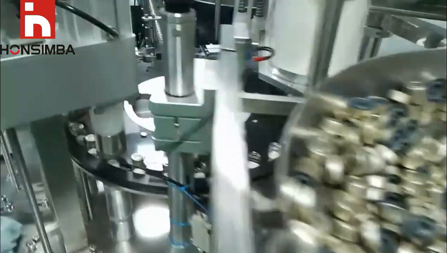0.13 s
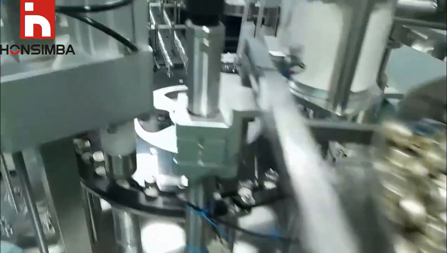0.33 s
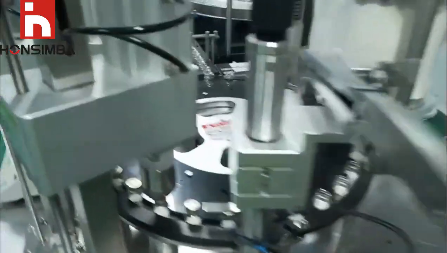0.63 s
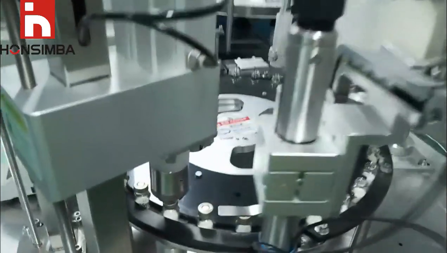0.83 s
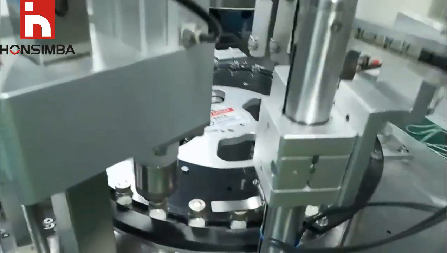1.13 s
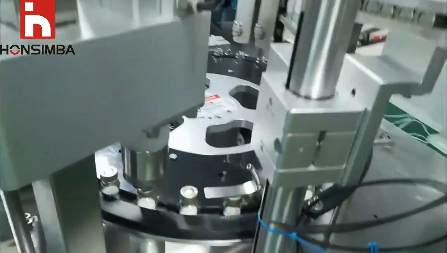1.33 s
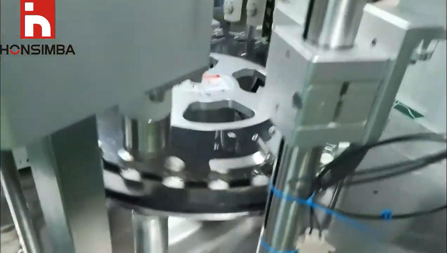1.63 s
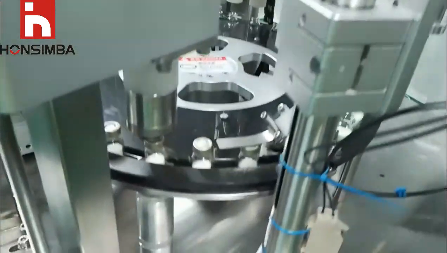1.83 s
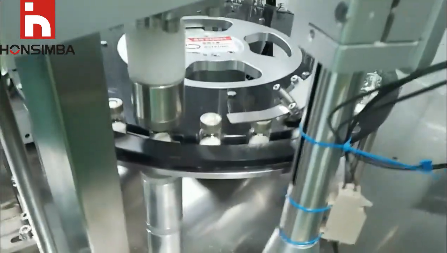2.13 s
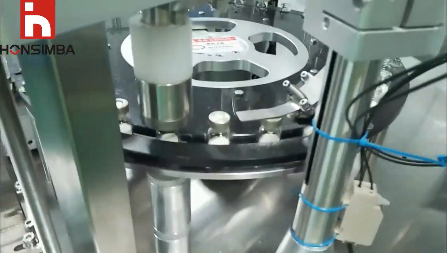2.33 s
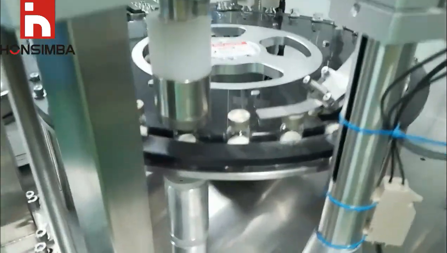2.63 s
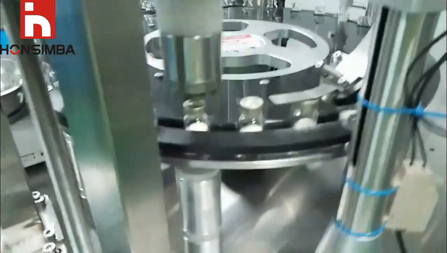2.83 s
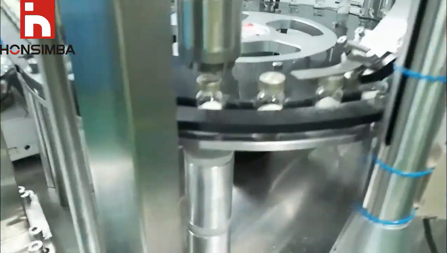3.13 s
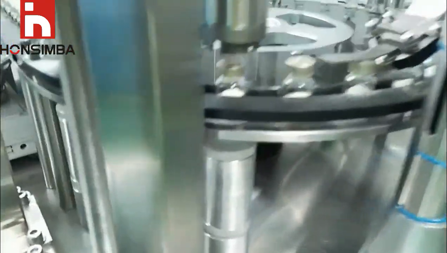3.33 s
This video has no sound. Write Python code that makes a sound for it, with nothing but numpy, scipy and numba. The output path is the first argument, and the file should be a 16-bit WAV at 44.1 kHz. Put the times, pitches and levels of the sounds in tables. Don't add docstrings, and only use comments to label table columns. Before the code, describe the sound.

Pneumatic capping machine in a factory hall, heard close on a thin phone microphone: bright whistling air jet, short valve spits with metallic clicks, a long hissing blast, then puffs, crimping whirr and thuds.

```python
import sys
import numpy as np
from scipy import signal
from scipy.fft import rfft, irfft
from scipy.io import wavfile
from scipy.ndimage import uniform_filter1d
from numba import njit

SR = 44100
rng = np.random.default_rng(int(sys.argv[2]) if len(sys.argv) > 2 else 0)


def wrap_up_sound(samples):
    columns = np.atleast_2d(samples).T
    tamed = np.clip(columns, -1, 1)
    steps = np.round(tamed * 32767).astype(np.int16)
    wavfile.write(sys.argv[1], SR, steps)


def nominal_scale(level):
    x = np.asarray(level, float) / 20
    return 10 ** x


N = 154350

# frequency in Hz, density in dB per Hz.
LEAK_SPECTRUM = [(700, -26.5), (1300, -4), (2600, -1.5), (4500, -5), (6500, -2.5), (8200, 2), (10300, -7),
                 (14500, -10)]
# time in seconds, level change in dB.
LEAK_PATH = [(0, 0), (.6, 0.5), (.88, 0), (1.27, .5), (1.7, 0.5), (1.85, -2), (2.04, -1.5), (3.0, 1),
             (3.3, -0.5), (3.5, 0.5)]
# frequency in Hz, density in dB per Hz.
HALL_SPECTRUM = [(20, -48), (60, -26), (105, -18), (160, -31), (200, -14), (290, -4.5), (600, -6),
                 (1500, -7)]
# frequency in Hz, width in Hz, level in dB.
FRAME_MODES = [(286.3, 60, -51), (209.2, 17, -64.5), (629, 100, -51), (740, 100, -54)]
# frequency in Hz, rms level in dB.
MAINS_HUM = [(100, -63)]
# start in seconds, peak level in dB, pitch in Hz, decay time (T60) in seconds.
THUDS = [(0.47, -27.5, 275, 0.26), (.47, -33, 641, 0.35), (.4, -33, 730, .15), (.5, -36, 520, .15),
         (0.574, -26.5, 310, 0.11), (.63, -36, 285, .12), (.77, -32.5, 285, 0.14), (.87, -38, 287, 0.18),
         (.955, -39, 287, 0.2), (1.118, -29, 1290, 0.045), (1.12, -29, 780, .04), (1.122, -28, 1900, .03),
         (1.116, -24.5, 940, 0.036), (1.125, -29, 605, 0.088), (1.123, -26, 415, 0.2),
         (1.135, -33, 280, .3), (1.211, -39, 259.6, 0.39), (2.045, -33, 301, 0.32), (2.09, -36, 266, 0.28),
         (2.045, -48, 58, 0.5), (1.121, -45, 109.5, 0.094), (2.959, -46.5, 116.5, 0.26),
         (0.53, -47, 110.6, 0.42), (2.132, -24, 682, 0.08), (2.141, -31.5, 318, 0.15),
         (2.853, -27, 660, .1), (2.87, -34, 720, .3), (2.92, -35, 620, .3), (2.855, -32.5, 259.6, 0.38),
         (2.855, -32.5, 479, 0.13), (2.9, -32.5, 268.5, 0.21), (2.956, -29, 302, 0.15),
         (3.03, -36, 292, 0.33), (3.47, -33, 685, 0.22), (3.485, -28.5, 377, 0.21)]
# start in seconds, length in seconds, level in dB, centre in Hz.
WHIRRS = [
    (3.05, 0.19, -34, 1500),
    (2.03, 0.34, -32, 2050),
    (2.3, .24, -29, 12000),
    (2.13, .2, -42, 700),
]
# frequency in Hz, density in dB per Hz.
JET_SPECTRUM = [(500, -21), (1180, -19), (2160, -12.5), (4310, -8.5), (6600, -3.5), (8300, -1.5),
                (10300, -9), (14500, -12)]
# frequency in Hz, width in Hz, level in dB.
NOZZLE_MODES = [(6540, 700, -0.5), (8476, 1100, -0.5), (2185, 390, -14)]
# peak time in seconds, level in dB, rise in seconds, fall in seconds, dull body share in dB.
PUFFS = [(0.487, -19.5, 0.024, 0.022, -33), (0.586, -23.5, 0.02, 0.047, -10.5),
         (.82, -30, 0.045, 0.024, -4), (1.126, -19.5, 0.0095, 0.012, -3.5),
         (1.224, -27.5, 0.029, 0.021, -17), (1.5075, -15, 0.0045, 0.0037, -8),
         (1.52, -25, .006, 0.0064, -12), (1.57, -26, .01, 0.0073, -29), (1.583, -20, .002, 0.0078, -5),
         (1.624, -25, 0.006, .005, -20), (1.6432, -15.5, 0.003, 0.005, -16),
         (1.634, -27, .003, 0.0033, -20), (1.75, -31, 0.033, 0.074, -33), (2.13, -21.5, 0.0015, 0.034, 1),
         (2.701, -21, 0.016, 0.038, -38), (2.751, -20.5, .01, 0.0092, -14.5),
         (2.77, -20, 0.009, 0.012, -11), (2.799, -17, 0.023, 0.0088, -12), (2.829, -32, 0.02, 0.011, -6),
         (2.864, -14, 0.011, 0.013, -14), (2.939, -29.5, 0.024, 0.053, -2),
         (3.2, -28.5, 0.063, 0.027, -5.5), (3.497, -21.5, 0.0088, 0.0096, -7)]
# start in seconds, peak level in dB, pitch in Hz.
TICKS = [(1.5808, -12.5, 5470), (2.1276, -25, 7900), (2.6, -28, 5800), (3.212, -15, 7000),
         (0.51, -32, 5500), (1.5055, -23, 7150), (1.4, -22, 8110), (1.642, -20, 5000), (1.6, -16.5, 6600),
         (2.7432, -24, 5000), (2.8609, -16, 11000), (.5776, -22, 8310), (1.1228, -19.5, 8560),
         (3.1, -20, 8620)]
# time in seconds, flow level in dB, guard slot whistle in dB.
BLASTS = [
    [(0, -18, 2.5), (.08, -15.5, 0), (.15, -16, 2), (.265, -18.5, 2.5), (.338, -26.5, 4), (.38, -22.5, -3),
     (.418, -20.5, 0), (.446, -29.5, -1), (.46, -26.5, 0.5)],
    [(2.04, -40, -2), (2.048, -24.5, 1), (2.065, -26, 1), (2.1, -22, 1), (2.126, -31, 0)],
    [(2.129, -16.5, 1.5), (2.166, -18, 3), (2.2, -15, 3), (2.32, -14.5, 0.5), (2.365, -16, 1),
     (2.45, -15, -3), (2.55, -14, -2.5), (2.58, -16.5, -1.5), (2.64, -15, -4)],
]
# frequency in Hz, rounding step over band rms in dB.
PHONE_STEP = [(600, -12), (1500, 1), (2200, 6.5), (4900, 6.8), (5900, 2.5), (9500, 3), (10800, 6.8),
              (14000, 6.8)]
THIN_MIDS_S = [.15, .195, .26, .36, .43, .45, .57, .66, .76, .97, .99, 1.15, 1.52, 1.635, 1.96, 2.05, 2.1,
               2.215, 2.36, 2.38, 2.41, 2.6, 2.7, 2.75, 2.8, 2.82, 2.87]
THIN_TOP_S = [.36, .43, .45, .57, .66, .8, .85, 1.13, 1.52, 1.635, 1.82, 1.96, 2.05, 2.52, 2.7, 2.75, 2.82,
              2.96, 3.0, 3.05, 3.17, 3.19, 3.29]

LEAK_DB, LEAK_SWELL_DB, LEAK_FLICKER_DB, HALL_DB = -27.5, 0, 1.04, -39.5
CAPS_PER_S, CAPS_DB, CAP_HZ, CAP_CYCLES = 540, -35, 7307, 16
THUD_PUSH_S, THUD_TAIL_DB, FRAME_T60_S = 0.0033, -13, 0.6
JET_FLICKER_DB, NOZZLE_DB, NOZZLE_FLICKER_DB = 0.8, -6.5, 1.2
SPIT_PER_S, SPIT_DB = 160, -24.5
TICK_T60_S = 0.02
SLOT_HZ, SLOT_WIDTH_HZ, BLAST_TAIL_S = 8460, 1700, 0.076
BUFFET_HZ, BUFFET_DB, SPUTTER_DB = 49.7, -58, 1.0
LIMIT, TOP_HZ = 0.6, 14050
FRAME_LEN, BAND_LINES = 944, 16
STEP_FRAME_DB, STEP_BAND_DB, ROUND_AT, ATTACK_DB = 1.2, 2.4, 0.4, 6
MASK_PER_DB, MASK_HZ, THIN_DB = 0.1, 5600, 5


def rms1(x):
    return x / np.sqrt(np.mean(x ** 2))


@njit
def svf(x, hz, width):
    y, b, l = np.empty(len(x)), 0., 0.
    for i in range(len(x)):
        g, k = np.tan(np.pi * hz[i] / SR), width / hz[i]
        v = (b + g * (x[i] - l)) / (1 + g * (g + k))
        b, l, y[i] = 2 * v - b, l + 2 * g * v, k * v
    return y


def band(hz, width, x=None):
    if x is None:
        x = rng.standard_normal(N)
    hz = np.minimum(hz + np.zeros(N), 0.45 * SR)
    once = svf(x, hz, 1. * width)
    return rms1(svf(once, hz, 1. * width))


def walk(rate):
    k = int(SR / rate)
    steps = np.repeat(rng.standard_normal(N // k + 1), k)
    return 1.3 * uniform_filter1d(uniform_filter1d(steps, k), k)[:N]


def colour(table, flicker_db, rate):
    hz, db = np.array(table, float).T
    bins, out = np.fft.rfftfreq(N, 1 / SR), 0
    shape = nominal_scale(np.interp(np.log(bins + 1), np.log(hz), db, left=-90, right=-90))
    noise = rfft(rng.standard_normal(N)) * shape
    for centre in np.arange(np.log2(hz[0]), np.log2(hz[-1]) + 0.5, 0.5):
        distance = np.clip(2 * (np.log2(bins + 1) - centre), -1, 1)
        part = np.cos(np.pi / 2 * distance) ** 2
        out = out + irfft(noise * part, N) * nominal_scale(flicker_db * walk(rate))
    return rms1(out)


def clicks(per_s, spread_db):
    chance, size = rng.random((N, 2)).T
    return (chance < per_s / SR) * nominal_scale(-spread_db * np.log(size + 1e-9)) * rng.choice([-1, 1], N)


def ring(t, start, hz, t60, push):
    u = np.maximum(t - start, 0)
    return (1 - np.exp(-u / push)) * np.exp(-np.log(1000) * u / t60) * np.sin(2 * np.pi * hz * u)


def factory_hall(t):
    out = nominal_scale(HALL_DB) * colour(HALL_SPECTRUM, 1.5, 8.09)
    for hz, width, db in FRAME_MODES:
        out = out + nominal_scale(db + walk(15)) * band(hz, width)
    for hz, db in MAINS_HUM:
        out = out + nominal_scale(db + 2 * walk(5.6)) * np.sin(2 * np.pi * hz * t)
    return out


def air_leak(t):
    level_db = LEAK_DB + np.interp(t, *np.array(LEAK_PATH).T) + LEAK_SWELL_DB * walk(9.05)
    return nominal_scale(level_db) * colour(LEAK_SPECTRUM, LEAK_FLICKER_DB, 15)


def cap_bowl():
    out = 0
    for ratio in (0.82, 0.93, 1.12):
        hz = CAP_HZ * ratio
        knocks = np.clip(clicks(CAPS_PER_S / 3, 2.5), -2, 2)
        out = out + band(hz, hz / CAP_CYCLES, knocks)
    return nominal_scale(CAPS_DB) * rms1(out)


def whirrs(t):
    out = 0
    for start, length, db, hz in WHIRRS:
        swell = np.sin(np.pi * np.clip((t - start) / length, 0, 1))
        out = out + nominal_scale(db) * swell * band(hz, 0.5 * hz)
    return out


def cylinders(t):
    out = 0
    for start, db, hz, t60 in THUDS:
        fade = np.clip((t - start) / 0.0082, 0, 1)
        fade = fade * np.exp(-np.log(1000) * np.maximum(t - start, 0) / FRAME_T60_S)
        tail = nominal_scale(THUD_TAIL_DB) * band(hz, 0.56 * hz) * fade
        low = ring(t, start, hz, t60, THUD_PUSH_S)
        high = 0.3 * ring(t, start, 1.4 * hz, t60, THUD_PUSH_S)
        out = out + nominal_scale(db) * (low + high + tail)
    return out


def metal_ticks(t):
    out = 0
    for start, db, hz in TICKS:
        low = ring(t, start, hz, TICK_T60_S, 0.0003)
        high = 0.6 * ring(t, start, 1.47 * hz, 0.6 * TICK_T60_S, 0.0002)
        out = out + nominal_scale(db) * (low + high)
    return out


def compressed_air():
    spits = np.clip(clicks(SPIT_PER_S, 3.5), -2.5, 2.5)
    tones = 0
    for hz, width, db in NOZZLE_MODES:
        level = nominal_scale(db + NOZZLE_FLICKER_DB * walk(25.3))
        tones = tones + level * band(hz * (1 + 0.014 * walk(14)), width)
    hiss = colour(JET_SPECTRUM, JET_FLICKER_DB, 18)
    return rms1(hiss + nominal_scale(NOZZLE_DB) * tones + nominal_scale(SPIT_DB) * band(9700, 4500, spits))


def valves(t, jet):
    out, body = 0, band(3100, 5100)
    other_air = jet[::-1]
    for peak, db, rise, fall, body_db in PUFFS:
        swell = np.exp(-((t - peak) / rise) ** 2)
        decay = np.exp(-np.maximum(t - peak, 0) / fall)
        out = out + nominal_scale(db) * np.where(t < peak, swell, decay) * (other_air + nominal_scale(body_db) * body)
    return out


def nozzle(t, jet):
    out = 0
    slot = svf(jet, SLOT_HZ + np.zeros(N), SLOT_WIDTH_HZ)
    buffet = nominal_scale(BUFFET_DB + 3.4 * walk(26)) * band(BUFFET_HZ, 70)
    sputter = nominal_scale(SPUTTER_DB * walk(29.88) + 0.74 * walk(90))
    for rows in BLASTS:
        s, flow_db, slot_db = np.array(rows).T
        tail = np.exp(-np.maximum(t - s[-1], 0) / BLAST_TAIL_S)
        flow = (t >= s[0]) * nominal_scale(np.interp(t, s, flow_db)) * tail
        whistle = (nominal_scale(np.interp(t, s, slot_db)) - 1) * slot
        out = out + flow * ((jet + whistle) * sputter + buffet)
    return out


def scene():
    t, jet = np.arange(N) / SR, compressed_air()
    air = nozzle(t, jet) + valves(t, jet)
    machine = metal_ticks(t) + cylinders(t) + whirrs(t)
    background = air_leak(t) + cap_bowl() + factory_hall(t)
    mono = air + machine + background
    return np.array([mono, mono])


def phone_thinning(x):
    m, count = FRAME_LEN, N // FRAME_LEN + 2
    n, k = np.arange(2 * m), np.arange(m)
    window = np.sin(np.pi / 2 * np.sin(np.pi * (n + 0.5) / (2 * m)) ** 2)
    basis = np.sqrt(2 / m) * window * np.cos(np.pi / m * np.outer(k + 0.5, n + 0.5 + m / 2))
    halves = np.pad(x, (m, count * m - N)).reshape(-1, m)
    frames = np.hstack([halves[:-1], halves[1:]])
    lines = (frames @ basis.T).reshape(count, -1, BAND_LINES)
    hz = (np.arange(m // BAND_LINES) + 0.5) * BAND_LINES * SR / (2 * m)

    power = np.mean(frames.reshape(count, 16, -1) ** 2, axis=2) + 1e-12
    rise = power[:, 4:12] / (power[:, 2:10] + power[:, 3:11]) * 2
    attack = np.max(rise, axis=1) > nominal_scale(2 * ATTACK_DB)
    band_db = np.interp(hz, *np.array(PHONE_STEP).T) + STEP_BAND_DB * rng.standard_normal((count, len(hz)))
    frame_db = STEP_FRAME_DB * rng.standard_normal(count) - 20 * attack
    db = band_db + frame_db[:, None]

    loud_db = 10 * np.log10(power.mean(axis=1))
    db = db + MASK_PER_DB * np.outer(loud_db - loud_db.mean(), hz < MASK_HZ)
    mids, top = (hz > 2500) & (hz < 5100), hz > 10300
    for times, weak in ((THIN_MIDS_S, mids), (THIN_TOP_S, top)):
        hit = np.isin(np.arange(count), np.round(np.array(times) * SR / m))
        db = db + THIN_DB * np.outer(hit, weak)

    rms = uniform_filter1d(np.sqrt(np.mean(lines ** 2, axis=2)), size=3, axis=1)
    step = (nominal_scale(db) * rms + 1e-12)[..., None]
    rounded = np.sign(lines) * np.floor(np.abs(lines) / step + ROUND_AT) * step
    back = rounded.reshape(count, m) @ basis
    return (back[:-1, m:] + back[1:, :m]).ravel()[:N]


def band_limit(x):
    return signal.sosfilt(signal.butter(12, 14930, fs=SR, output="sos"), x)


def record(dry):
    x = LIMIT * np.tanh(dry[0] / LIMIT)
    top_cut = signal.ellip(10, 0.2, 60, TOP_HZ, fs=SR, output="sos")
    x = signal.sosfilt(top_cut, phone_thinning(x))
    return band_limit(np.array([x, x]))


dry = scene()
out = record(dry)
wrap_up_sound(out)
```